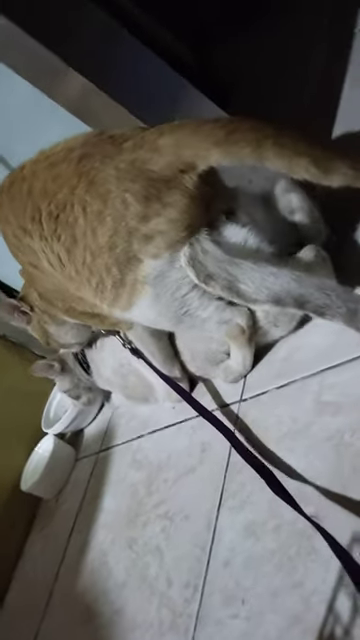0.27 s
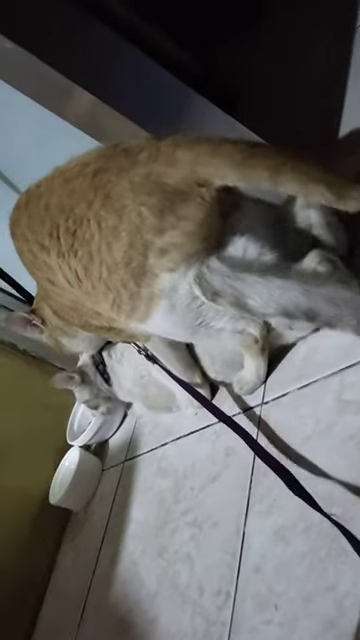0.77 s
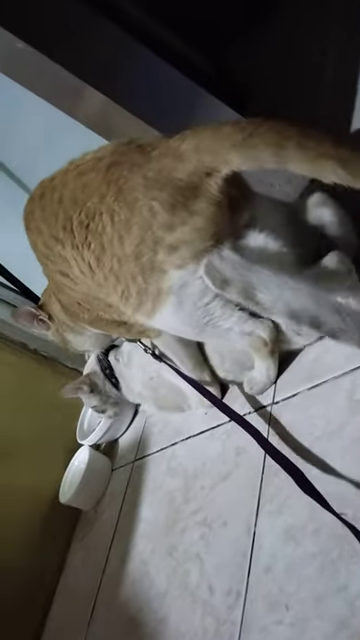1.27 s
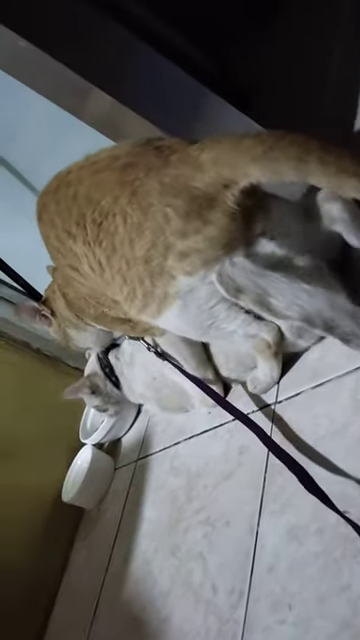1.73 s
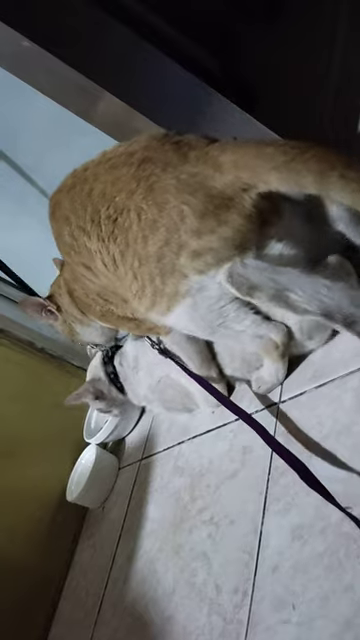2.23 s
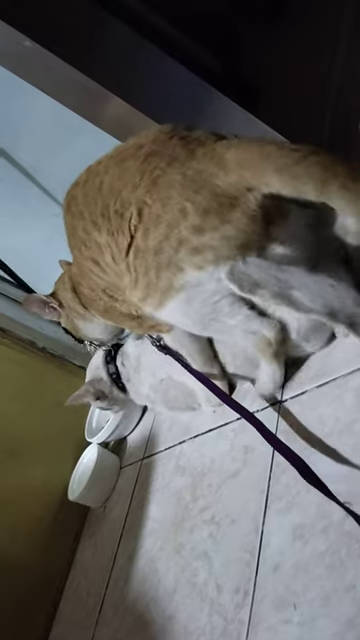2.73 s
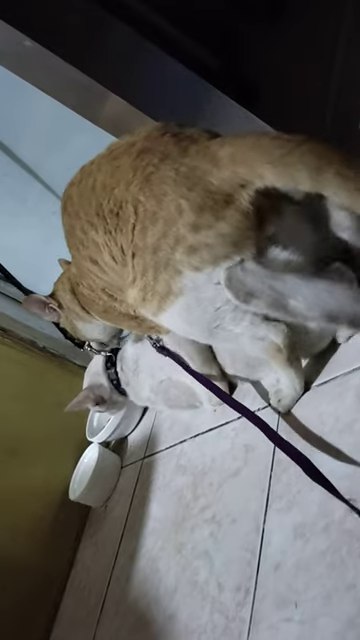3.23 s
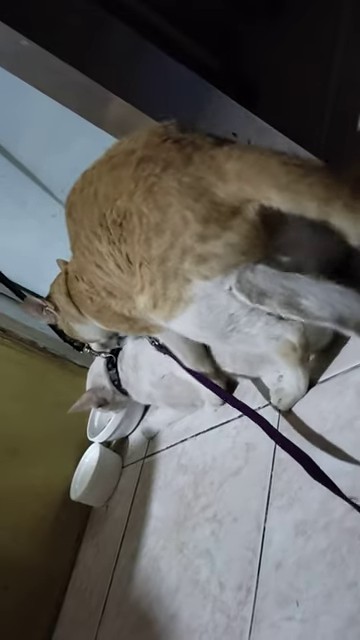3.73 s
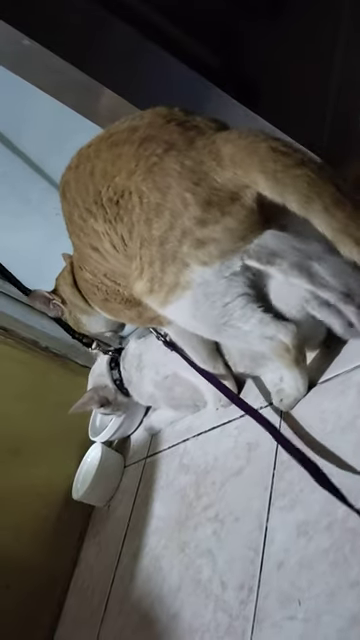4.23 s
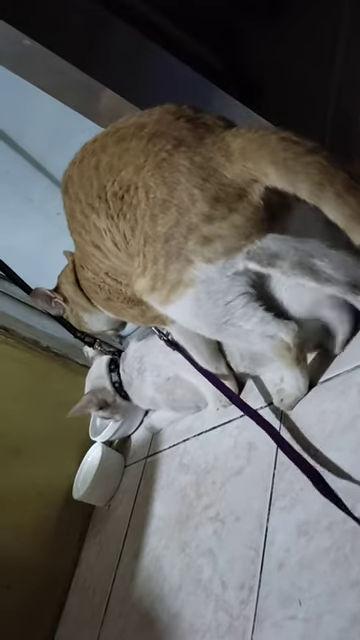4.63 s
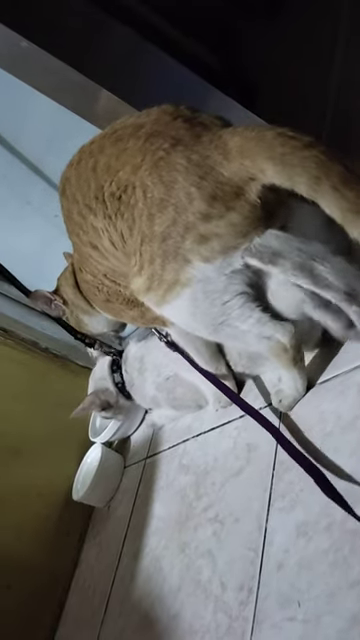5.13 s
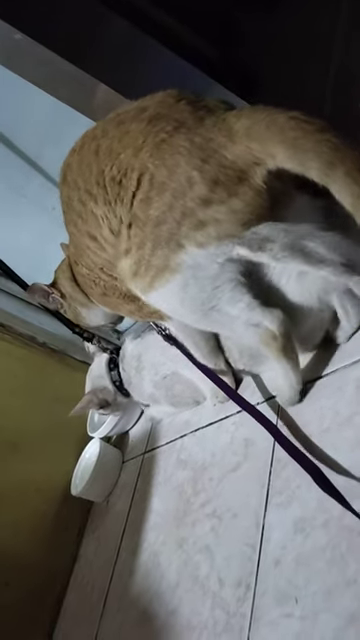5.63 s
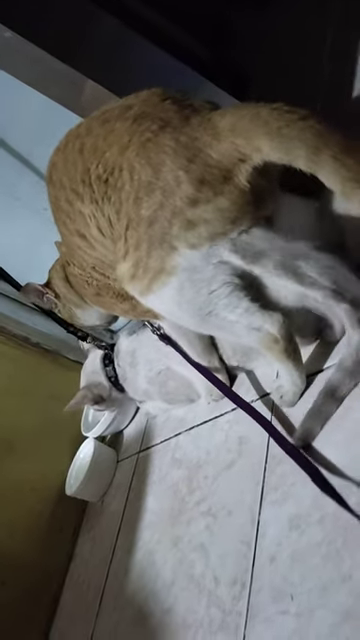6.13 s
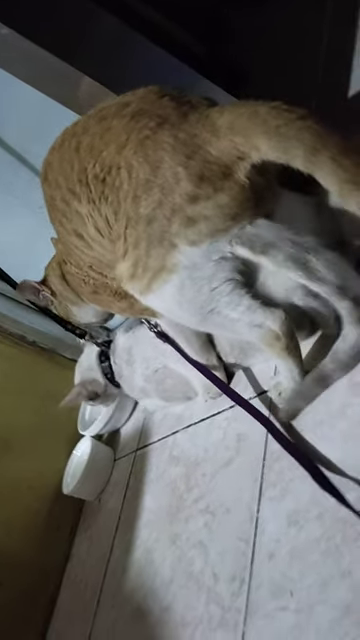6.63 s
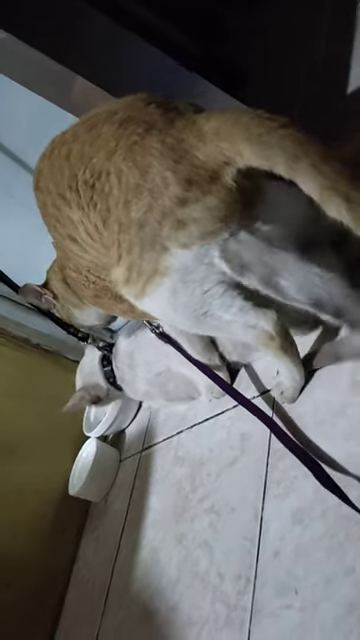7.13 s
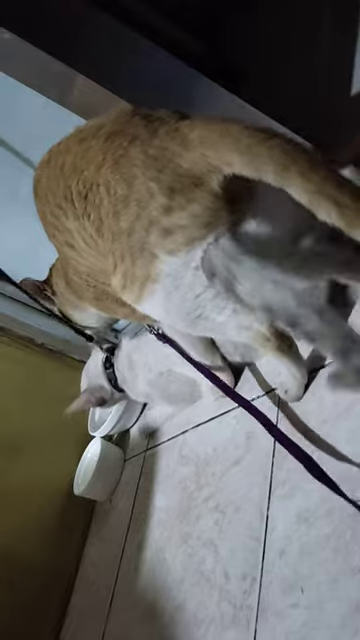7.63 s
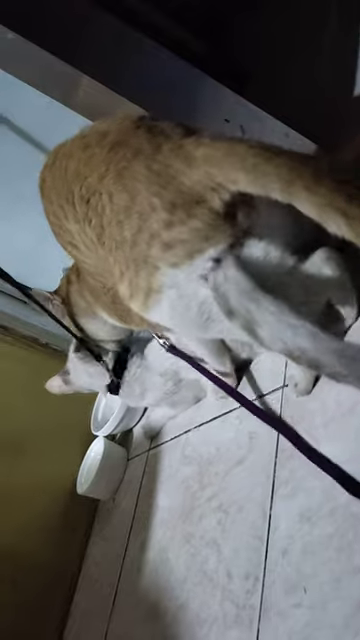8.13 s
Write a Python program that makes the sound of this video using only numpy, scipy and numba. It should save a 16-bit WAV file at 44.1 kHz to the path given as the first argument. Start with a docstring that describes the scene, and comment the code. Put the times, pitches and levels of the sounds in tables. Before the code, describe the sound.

In a small tiled room, a cat gives a low closed-mouth growl ending in a soft nasal huff, then a shorter, broken growl. A motorcycle throbs outside over low rumble and faint fan hum, revs up and changes gear. Small dry ticks and a faint shrill rattle, perhaps a collar chain, precede a last growl that leaps into a loud hoarse yowl and screech. Close handheld microphone, muffled top.

```python
"""Two closed-mouth cat growls, the first ending in a huff, then a rising yowl and screech in a tiled room.
Outside, a motorcycle pulls away through two gears over traffic and fan rumble; a faint shrill rattle
follows most ticks, perhaps a collar chain. The cat is fold pulses and breath noise through moving
resonances; the motorcycle is wavering orders of its firing rate plus road noise. Filtered noise makes
ticks, huff, air, rumble and rattle; sines make the fan hum and faint tones, most probably of the engine."""
import sys
import numpy as np
from scipy import signal
from scipy.fft import rfft, irfft, next_fast_len
from scipy.io import wavfile
from scipy.ndimage import uniform_filter1d
from numba import njit

SR = 44100
rng = np.random.default_rng(int(sys.argv[2]) if len(sys.argv) > 2 else 0)


def transcribe(signal):
    """Save signal, clipped to [-1, 1], as a 16-bit WAV file at the path in sys.argv[1]."""
    frames = np.atleast_2d(signal).T
    limited = np.clip(frames, -1, 1)
    pcm = np.round(limited * 32767).astype(np.int16)
    wavfile.write(sys.argv[1], SR, pcm)


N = 369999


def from_db(db):
    """Decibels to gain."""
    return 10 ** (np.asarray(db) / 20)


def rms_one(x):
    """Scales to unit rms."""
    return x / np.sqrt(np.mean(x ** 2) + 1e-20)


def in_time(rows, at):
    """Table columns interpolated at the given sample numbers."""
    time_s, *columns = np.transpose(rows)
    return [np.interp(at / SR, time_s, column) for column in columns]


def drift(rate_hz, size=N):
    """Slow random wander of unit rms: noise through a double pole, computed at a tenth of the rate."""
    r = np.exp(-20 * np.pi * rate_hz / SR)
    noise = rng.standard_normal(size // 10 + 8002)
    slow = signal.lfilter([1], [1, -2 * r, r * r], noise)[8000:]     # skip the filter's start-up
    return np.interp(np.arange(size) / 10, np.arange(len(slow)), rms_one(slow))


def coloured(x, spectrum):
    """Filters x by a (frequency [Hz], level [dB]) table, silent outside it; unit rms."""
    size = next_fast_len(len(x))
    hz = np.arange(size // 2 + 1) * SR / size + 1
    knots_hz, level_db = np.transpose(spectrum)
    gain = from_db(np.interp(np.log(hz), np.log(knots_hz), level_db, left=-120, right=-120))
    return rms_one(irfft(rfft(x, size) * gain, size)[:len(x)])


@njit
def resonate(x, hz, width, sr):
    """Two-pole resonance whose centre and width move sample by sample."""
    out, last, before = np.zeros(len(x)), 0., 0.
    for i in range(len(x)):
        r = np.exp(-np.pi * width[i] / sr)
        c = 2 * r * np.cos(2 * np.pi * hz[i] / sr)
        out[i] = (1 - c + r * r) * x[i] + c * last - r * r * before
        last, before = out[i], last
    return out


def edge(x, hz, kind, order=4):
    """Butterworth high-pass, low-pass or band-pass."""
    return signal.sosfilt(signal.butter(order, hz, kind, fs=SR, output="sos"), x)


def band_around(x, hz, width_hz):
    """Band-pass given by centre and width."""
    return edge(x, [hz - width_hz / 2, hz + width_hz / 2], "band", order=2)


def evened(x, size=2600):
    """Holds the running rms at one over a window of size samples."""
    return x / np.sqrt(uniform_filter1d(x ** 2, size=size) + 1e-12)


def swell(start_s, end_s, edge_s):
    """Ramps from 0 to 1 after the start and back to 0 by the end."""
    s = np.arange(N) / SR
    return np.clip(np.minimum(s - start_s, end_s - s) / edge_s, 0, 1)


def call(rows):
    """Fold pulses with jitter, flutter and breath noise pass chest, mouth and upper resonances."""
    # mouth opening: (mouth resonance [Hz], its width [Hz], upper resonance [Hz], its width [Hz],
    # flutter depth [0-1], then fundamental, upper, third and top band [dB re call level])
    opening = [(373, 380, 1200, 340, .6, 9.5, -28.5, -62, -53.5),
               (468, 85, 1100, 340, 1, 0, -50, -61.5, -52.5),
               (500, 95, 2440, 340, 0.96, -2.5, -36, -56, -42),
               (600, 120, 2440, 340, 0.54, -4, -27.5, -54, -32),
               (950, 140, 2340, 290, 0.33, -12, -16.5, -39, -32),
               (1220, 230, 2620, 210, 0.3, -16, -15, -34, -31),
               (1560, 420, 3060, 280, 0.3, -18, -21, -36, -28.5),
               (1780, 560, 2920, 400, 0.4, -9, -14, -32, -24),
               (2069, 160, 3170, 340, 0.2, -9.5, -10, -28, -25),
               (2423, 980, 3400, 880, 0.27, -5, 0.5, -8, -9)]
    # side cavities of the head absorb: (centre [Hz], width [Hz], share [0-1], share at full gape [0-1])
    hollows = [(2060, 390, 1, 0.31), (4630, 350, 0.98, 0.85), (5940, 120, 0.5, 0.1)]
    at = np.arange(round(rows[0][0] * SR), min(round(rows[-1][0] * SR), N))
    size = len(at)
    pitch_hz, call_db, mouth_hz, hoarse = in_time(rows, at)
    call_db = call_db + 1.5 * hoarse * drift(12, size)     # uneven push of the lungs

    knots_hz, *columns = np.transpose(opening)
    mouth_width_hz, upper_hz, upper_width_hz, flutter, *bands_db = [
        np.interp(mouth_hz, knots_hz, column) for column in columns]
    flutter = flutter * np.clip(hoarse / 0.7, 0, 1)     # a clear voice flutters less
    fundamental_db, upper_db, third_db, top_db = call_db + np.array(bands_db)

    # the false folds beat against the voice, around 68 Hz
    beat_hz = 68.24 * (1 + 0.1063 * drift(5, size))
    beat = np.cos(2 * np.pi * np.cumsum(beat_hz) / SR)
    rough = 0.09 + 0.3 * hoarse     # a breathier voice is less steady
    jitter = rough * (0.0315 * drift(19.9, size) + 0.0514 * drift(70, size))
    phase = 2 * np.pi * np.cumsum(pitch_hz * (1 + jitter + 0.045 * flutter * beat)) / SR
    # phase lag by the square of the order [rad] blunts each pulse
    pulses = sum(np.cos(k * phase - 0.35 * k ** 2) * (k * pitch_hz < 9000) for k in range(2, 30))
    shimmer = (1 + np.clip(flutter, 0, 1) * beat) * from_db(2.8 * rough * drift(37, size))
    voiced = shimmer * pulses
    breath = rng.standard_normal(size) * (1 + 0.5 * np.cos(phase))     # air rushes while the folds are open

    mouth_breath = (2.4 + 1.8 * flutter ** 2) * hoarse
    mouth = resonate(voiced + mouth_breath * breath, mouth_hz, mouth_width_hz, SR)
    for _ in range(2):     # the lips cut steeply above the mouth resonance
        mouth = resonate(mouth, mouth_hz, 3.33 * mouth_hz, SR)

    rasp = voiced + (1 + 13 * hoarse ** 2) * breath     # some breath always leaks
    upper = resonate(rasp, upper_hz, upper_width_hz, SR)
    upper = resonate(upper, 1.107 * upper_hz, upper_width_hz, SR)     # neighbour widens the rasp
    upper = edge(upper, 2600, "high")
    nose = band_around(rasp, 6840, 1400)

    # the third resonance rides above the upper one, strays in pitch and flickers
    third_hz = np.minimum(1.78 * upper_hz, 5200) * (1 + 0.025 * drift(4, size))
    third_width_hz = np.full(size, 650.)
    third = resonate(resonate(rasp, third_hz, third_width_hz, SR), third_hz, third_width_hz, SR)
    flicker_db = 4 * hoarse * drift(9, size)

    # the teeth ring once the mouth resonance has risen from 620 to 900 Hz
    bared = np.interp(mouth_hz, (620, 900), (0, 1))
    teeth = from_db(call_db - 15.5) * bared * evened(band_around(rasp, 1760, 290))
    # breath alone rings just above the mouth resonance
    hiss = edge(resonate(breath, 1.03 * mouth_hz, np.full(size, 70.), SR), 610, "high")
    hiss_share = hoarse * np.clip(mouth_hz / 1000 - 0.6, 0, 1)

    voice = from_db(fundamental_db) * np.sqrt(2) * np.cos(phase) * shimmer ** 0.39
    voice += from_db(call_db) * evened(edge(mouth, 250, "high"))
    voice += from_db(call_db - 1) * hiss_share * evened(hiss)
    voice += from_db(upper_db) * evened(upper)
    voice += teeth
    voice += from_db(top_db) * evened(nose)
    voice += from_db(third_db + flicker_db) * evened(edge(third, 3700, "high"))

    for hz, width_hz, *shares in hollows:
        share = np.interp(mouth_hz, (2100, 2400), np.clip(shares, 0, 1))
        voice = voice - share * signal.lfilter(*signal.iirpeak(hz, hz / width_hz, SR), voice)

    # a call that ends before the scene does fades out
    fade_out = (rows[-1][0] * SR - at) / 1200 if at[-1] < N - 2 else 1
    out = np.zeros(N)
    out[at] = voice * np.clip(np.minimum((at - at[0]) / 900, fade_out), 0, 1)
    return out


def yowl():
    """One call: growl, rise, hold and screech as the mouth resonance climbs."""
    # (time [s], pitch [Hz], level [dB], mouth resonance [Hz], breath share [0-1])
    yowl_curve = [(6.6, 197.3, -50, 437, 0.65), (6.76, 200.6, -38, 458, 1), (6.98, 212, -41.5, 435, 0.8),
                  (7.02, 224.8, -35, 473, 0.44), (7.065, 249.8, -29, 505, 0.45),
                  (7.11, 273, -31.5, 540, 0.38), (7.16, 277.2, -30.5, 560, 0.5),
                  (7.2, 282.8, -32.5, 566, 0.6), (7.24, 298, -28, 600, 0.5),
                  (7.265, 308.5, -32.5, 910, 0.8), (7.3, 313.2, -24, 937, 0.69),
                  (7.33, 314.3, -21, 960, 0.8), (7.36, 326.8, -20.5, 1050, 0.8),
                  (7.39, 345.4, -19.5, 1200, 0.7), (7.42, 368.1, -17, 1410, 0.46),
                  (7.45, 384, -17, 1554, .3), (7.54, 393, -20.5, 1660, 0.49), (7.565, 383, -19, 1600, 0.48),
                  (7.61, 399.3, -18.5, 1648, 0.68), (7.627, 382.8, -22.5, 1620, 0.7),
                  (7.66, 412.6, -16, 1680, 0.5), (7.7, 389.5, -23, 1640, 0.62),
                  (7.765, 382.2, -19, 1610, 0.8), (7.79, 396.5, -18.5, 1650, 0.48),
                  (7.87, 368, -27.5, 1639, 0.75), (7.91, 381.7, -22, 1654, 0.74),
                  (7.94, 356, -28, 1660, 0.87), (7.99, 365.6, -23.5, 1720, 0.82),
                  (8.03, 353.4, -28, 1802, 0.99), (8.09, 408.5, -20.5, 1840, 0.47),
                  (8.18, 459.3, -23.5, 2196, 0.4), (8.22, 491, -25.5, 2330, 0.35),
                  (8.25, 509.5, -26.5, 2410, 0.14), (8.3, 507.6, -26, 2400, 0.38),
                  (8.32, 506, -25.5, 2437, 0.17), (8.39, 510.5, -25.5, 2420, 0.2)]
    return call(yowl_curve)


def growls():
    """Calls with the lips shut, at a constant high breath share."""
    # one curve per growl: (time [s], pitch [Hz], level [dB], mouth resonance [Hz])
    growl_curves = [
        [(0.62, 204.4, -50.5, 470), (0.67, 208.8, -41.5, 457), (0.76, 198.2, -39.5, 403),
         (0.86, 214.7, -37.5, 427), (0.97, 195.2, -38, 415), (1.04, 207.2, -34, 429.2), (1.1, 221.2, -34, 477),
         (1.235, 227.5, -35.5, 484), (1.265, 255.7, -39.5, 370), (1.34, 246.3, -43, 375), (1.39, 242, -56, 418)],
        [(3.17, 198.5, -47.5, 440), (3.2, 204, -36.5, 450), (3.26, 228, -35, 458), (3.31, 221.8, -35, 450),
         (3.37, 215.4, -38, 460), (3.415, 208, -51, 455), (3.45, 213, -36, 459), (3.5, 221.4, -39, 463),
         (3.53, 236.2, -49, 473), (3.66, 240.4, -44, 479), (3.72, 243, -47, 490), (3.78, 236, -44, 480),
         (3.83, 241, -47, 485), (3.87, 247.4, -46.5, 490), (3.93, 246, -58, 500)],
    ]
    breath_share = 0.88
    return sum(call([(*row, breath_share) for row in rows]) for rows in growl_curves)


def puff():
    """Air let out through the nose at the end of the first growl: coloured noise."""
    # huff spectrum: (frequency [Hz], level [dB per Hz])
    puff_colour = [(400, -5), (600, 1), (1000, -4.5), (1400, -8), (1700, -22), (2200, -26), (2550, -15),
                   (2900, -29)]
    return from_db(-45) * swell(1.235, 1.385, 0.06) * coloured(rng.standard_normal(N), puff_colour)


def ticks():
    """Small dry ticks: a snap and milliseconds of dying noise, in a bright band and a duller body."""
    # (time [s], bright level [dB], body level [dB]), levels ahead of the band filters
    tick_rows = [(0.667, -59, -60), (2.388, -48, -56.5), (3.0, -53, -60), (5.977, -35, -41),
                 (7.139, -31.5, -47)]
    tail_db, tail_decay_s, size = -4, 0.006, 1500
    bright, body = np.zeros((2, N))
    for time_s, bright_db, body_db in tick_rows:
        at = round(time_s * SR)
        decay = np.exp(-np.arange(size) / SR / tail_decay_s)
        tick = from_db(tail_db) * rng.standard_normal(size) * decay
        tick[0] += 3     # the snap
        bright[at:at + size] += from_db(bright_db) * tick
        body[at:at + size] += from_db(body_db) * tick
    return edge(bright, 5400, "high") + edge(body, (1500, 3600), "band", order=2)


def room(x):
    """Ten feedback delays between tiled surfaces, duller on every round."""
    t60_s, wall_cut_hz = 0.45, 6600     # decay time before wall dulling
    size = next_fast_len(N + SR)
    hz = np.arange(size // 2 + 1) * SR / size
    dull = 1 / (1 + 1j * hz / wall_cut_hz)
    response = 0
    for k, lag_s in enumerate(rng.uniform(0.011, 0.04, 10)):
        loop = from_db(-60 * lag_s / t60_s) * dull * np.exp(-2j * np.pi * hz * lag_s)
        response = response + (-1) ** k * loop / (1 - loop)
    return irfft(rfft(x, size) * response, size)[:N]


def motorcycle():
    """Orders of the firing rate, each wavering by itself as street echoes shift, in the exhaust's colour."""
    # two pulls with a gear change between: (time [s], firing rate [1/s])
    firing = [(0, 16.8), (.4, 16.9), (1.4, 19.2), (2.1, 18.9), (2.6, 19.4), (3.2, 19.6), (4.1, 18.6),
              (4.6, 20.2), (5.1, 22.8), (5.6, 26.8), (5.75, 26), (6.0, 17), (6.5, 18), (7, 19), (7.5, 20.2),
              (8, 21.3), (8.39, 22.3)]
    # exhaust loudness: (time [s], level [dB])
    engine = [(0.0, -29), (0.09, -32), (1.07, -26), (2.73, -28), (2.87, -30.5), (2.97, -24), (4.88, -25),
              (5.09, -21.5), (5.28, -25), (5.56, -19), (5.8, -26.5), (5.82, -22.5), (5.89, -26.5),
              (6.26, -20.5), (8.04, -19.5), (8.39, -18.5)]
    # exhaust spectrum: (frequency [Hz], level [dB])
    exhaust = [(26, -40.5), (45, -17), (70, -29), (108, -8), (141, -1), (155, 1.5), (171, -5), (201, -18),
               (226, -17), (293, -24.5), (314, -22.5), (343, -26.5), (371, -25.5), (452, -32), (480, -43.5),
               (620, -74.5), (1060, -120)]
    now = np.arange(N)
    firing_hz = in_time(firing, now)[0] * (1 + 0.0044 * drift(3.28))
    turns = np.cumsum(firing_hz) / SR
    orders = np.zeros(N)
    for k in range(2, 26):
        wander_rad = (0.3 + (k / 10.98) ** 3) * drift(2.7)
        tone = np.cos(2 * np.pi * (k * turns + rng.random()) + wander_rad)
        orders += from_db(3.04 * drift(2.12)) * tone
    road = rms_one(edge(rng.standard_normal(N), [40, 500], "band", order=2))
    load = from_db(in_time(engine, now)[0])
    return load * evened(coloured(rms_one(orders) + 0.5 * road, exhaust), size=14000)


def engine_tones():
    """Faint tones of fixed centre pitch, most of them probably higher orders of the motorcycle's engine."""
    # (start [s], end [s], frequency [Hz], level [dB])
    tone_rows = [(0, 0.77, 274, -40.5), (0.6, 3.1, 350, -51.5), (1.9, 2.4, 636, -48.5),
                 (-0.5, 4.9, 4500, -79), (7.5, 8.6, 257.5, -34)]
    s = np.arange(N) / SR
    out = np.zeros(N)
    for start_s, end_s, hz, level_db in tone_rows:
        tone = from_db(3 * drift(7)) * np.sin(2 * np.pi * hz * s + 1.5 * drift(6))
        out += swell(start_s, end_s, 0.082) * from_db(level_db) * tone
    return out


def low_rumble():
    """Band of low noise around 58-108 Hz."""
    # (time [s], level [dB])
    rumble_level = [(0, -29.5), (4.2, -35), (7.1, -35), (7.6, -33), (8.39, -37.5)]
    noise = edge(rng.standard_normal(N), [58, 108], "band", order=3)
    return from_db(in_time(rumble_level, np.arange(N))[0]) * rms_one(noise)


def fan_hum():
    """A fan's sine hum, drifting in level and phase, with louder swells."""
    # (start [s], end [s], rise [dB])
    hum_swells = [(.35, 1.094, 11), (4.25, 4.6, 11), (4.8, 6.198, 22.5)]
    fan_hz, base_db, edge_s = 60.7, -57, 0.31
    level_db = base_db + 2 * drift(3.3)
    for start_s, end_s, rise_db in hum_swells:
        level_db = level_db + rise_db * swell(start_s, end_s, edge_s)
    phase = 2 * np.pi * fan_hz * np.arange(N) / SR + 0.49 * drift(2.2)
    return from_db(level_db) * np.sqrt(2) * np.sin(phase)


def air_noise():
    """Room air and far traffic: coloured noise that rises slowly."""
    # (frequency [Hz], level [dB per Hz])
    air_colour = [(240, -27.5), (400, -0.5), (447, -6), (486, -8), (543, -7), (644, -6), (843, -8),
                  (930, -8), (1310, -11), (1430, -14.5), (2330, -21.5), (2730, -25.5), (3400, -28.5),
                  (4290, -40.5), (5600, -39.5), (6000, -34), (7440, -32), (9670, -59.5), (16400, -120)]
    rise_db_per_s = 0.4143
    level_db = -46 + rise_db_per_s * np.arange(N) / SR + 0.77 * drift(2.5)
    return from_db(level_db) * coloured(rng.standard_normal(N), air_colour)


def shrill_rattle():
    """A narrow high noise band, flickering irregularly: a faint bed plus bursts, most following a tick."""
    # (start [s], length [s], level [dB])
    burst_rows = [(-.1, 0.28, -70), (2.097, 0.074, -65), (2.386, 0.073, -74), (2.99, 0.11, -66),
                  (5.964, 0.36, -62), (6.29, 1, -65.5), (7.16, 0.31, -62)]
    bed_db, edge_s = -81.5, 0.056
    shrill = rms_one(edge(rng.standard_normal(N), [6600, 6950], "band", order=2))
    flicker = from_db(4 * drift(15) - 2)
    gain = from_db(bed_db)
    for start_s, length_s, level_db in burst_rows:
        gain = gain + from_db(level_db) * swell(start_s, start_s + length_s, edge_s)
    return gain * flicker * shrill


def scene():
    """Cat and ticks sound in the room; the rest arrives without added reverberation."""
    near = growls() + yowl() + puff() + ticks()
    reverb = from_db(-13.5) * room(near)
    background = low_rumble() + fan_hum() + air_noise() + shrill_rattle()
    return (near + reverb + motorcycle() + engine_tones() + background)[None]


def record(dry):
    """The microphone loses the deepest bass; the chain cuts the top steeply."""
    cutoff_hz = 7575
    steep = signal.ellip(14, 0.5, 75, cutoff_hz, fs=SR, output="sos")
    return signal.sosfilt(steep, edge(dry, 50, "high", order=2))


dry = scene()
out = record(dry)
transcribe(out)
```